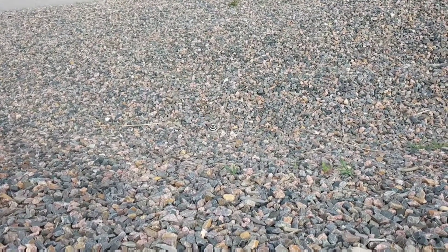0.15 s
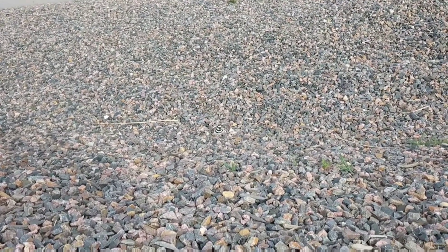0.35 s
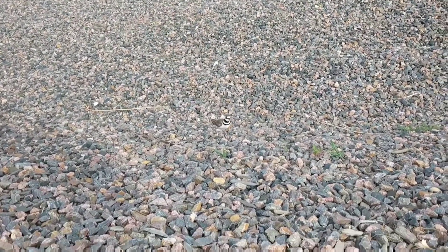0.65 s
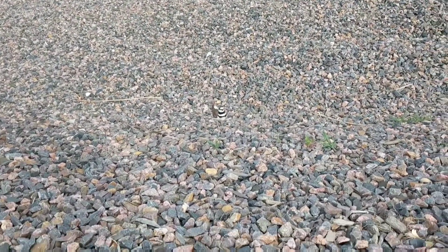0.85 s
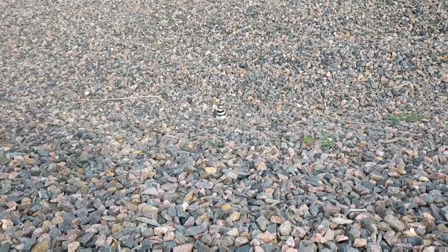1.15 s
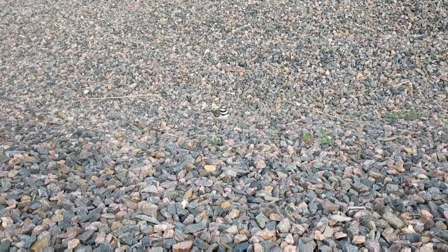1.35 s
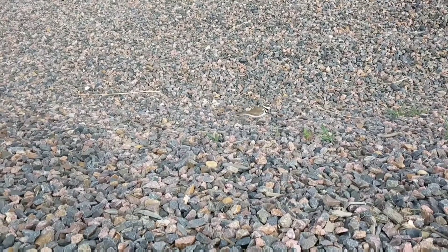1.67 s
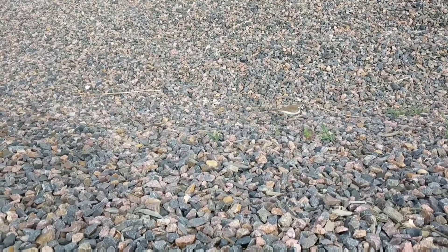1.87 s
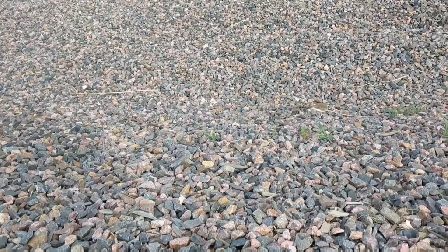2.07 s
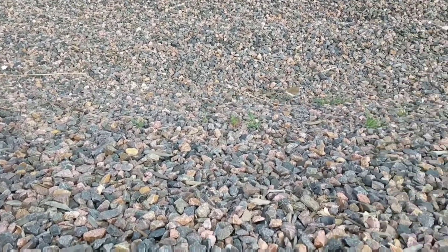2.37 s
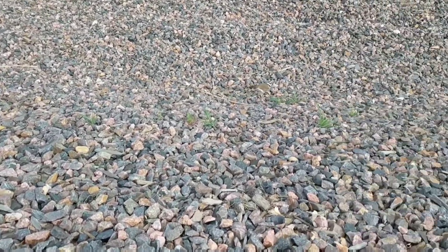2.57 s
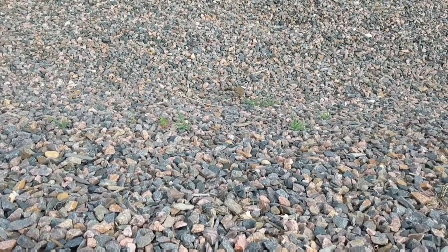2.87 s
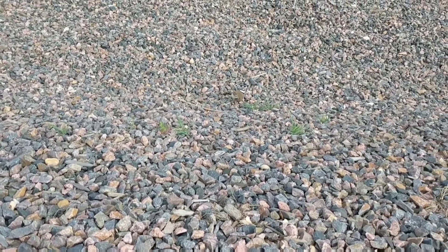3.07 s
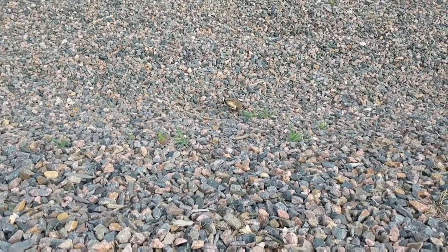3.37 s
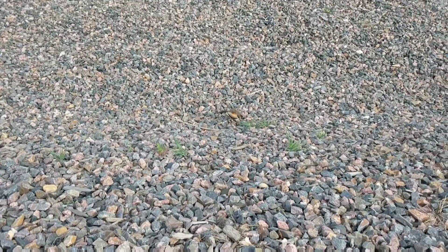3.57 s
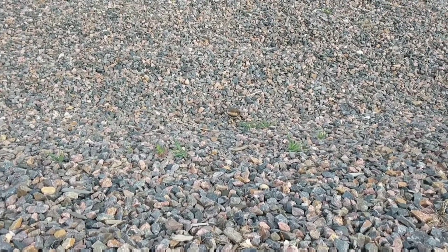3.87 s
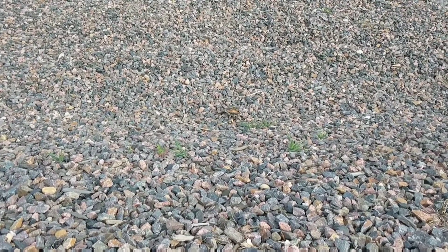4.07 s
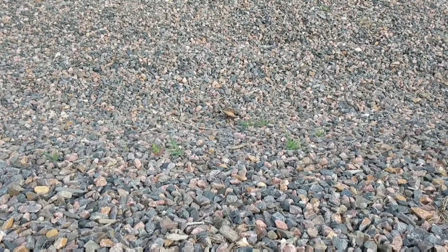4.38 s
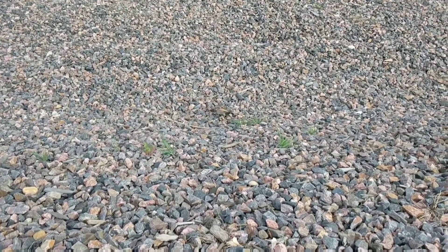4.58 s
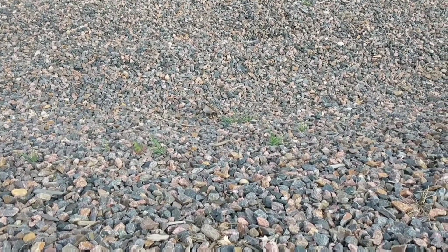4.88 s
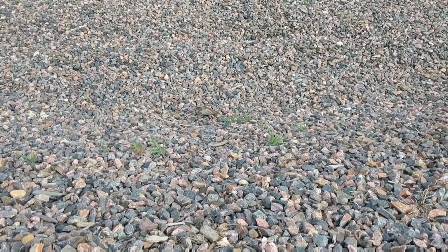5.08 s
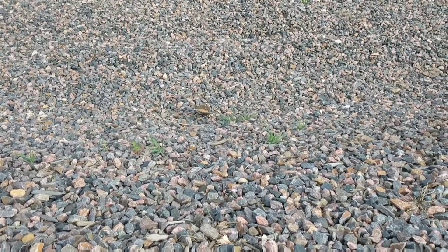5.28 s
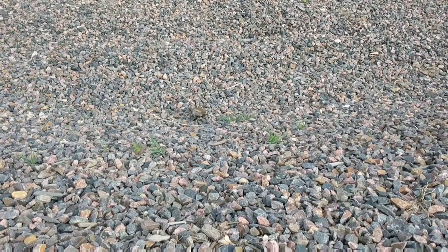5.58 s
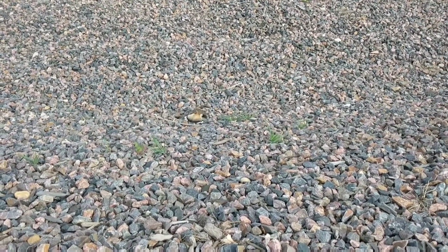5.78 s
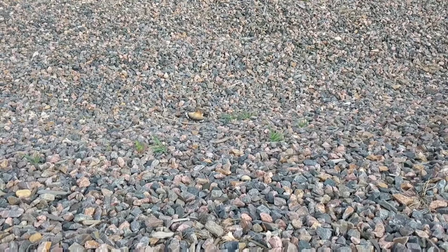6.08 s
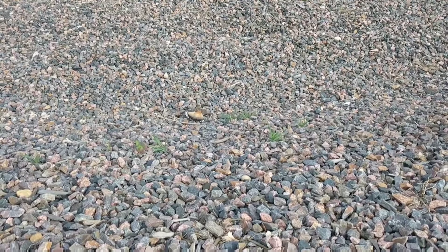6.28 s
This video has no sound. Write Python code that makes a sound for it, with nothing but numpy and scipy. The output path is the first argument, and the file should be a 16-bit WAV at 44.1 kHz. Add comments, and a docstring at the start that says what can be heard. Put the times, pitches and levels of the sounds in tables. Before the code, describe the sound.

A killdeer on gravel gives three piercing slurred cries, then a long stuttering trill, as wind buffets the microphone and distant songbirds whistle.

```python
"""Wind buffets the microphone throughout while a killdeer on open gravel gives three piercing cries,
then, later, a long stuttering trill. Songbirds whistle far off and a few small ticks sound close by.
The bird is stacks of roughened harmonics; the songbirds are single slurred sines with echoes.
Wind and air are shaped noise, with pulses for single eddies; the ticks are decaying noise bursts."""
import sys
import numpy as np
from scipy import signal
from scipy.fft import rfft, irfft
from scipy.io import wavfile
from scipy.ndimage import uniform_filter1d

SR = 44100
rng = np.random.default_rng(int(sys.argv[2]) if len(sys.argv) > 2 else 0)


def generate_wav(signal):
    """Clip the signal to [-1, 1] and save it as 16-bit WAV at the path in sys.argv[1]."""
    frames = np.transpose(np.atleast_2d(signal))
    scaled = np.clip(frames, -1, 1) * 32767
    pcm = np.round(scaled).astype(np.int16)
    wavfile.write(sys.argv[1], SR, pcm)


N = 284004
TIME = np.arange(N) / SR

# breeze on the microphone: time_s, relative rumble_db, relative flutter_db
BREEZE = [(0.0, -22.5, -28), (.33, -31, -39.5), (.72, -23.5, -23), (.97, -30.5, -41), (1.15, -30, -36),
          (1.25, -36.5, -54.5), (1.42, -31, -37), (1.65, -26, -35), (1.77, -36, -57.5), (1.9, -29, -35.5),
          (2.55, -35.5, -47.5), (2.8, -34.5, -36), (3.35, -40.5, -53.5), (3.7, -29, -48), (4.06, -40, -60),
          (4.7, -34, -42), (5.4, -31.5, -50.5), (5.7, -34, -48), (5.8, -33, -37), (6.44, -32, -31)]
# gusts on top of it: centre_s, width_s, relative flutter_db, relative rumble_db
GUST_ROWS = [(.12, 0.13, -27, -33), (0.225, 0.042, -26, -29), (0.528, 0.044, -20.5, -32),
             (1.065, .06, -30, -31.5), (1.36, .04, -34, -30), (1.847, 0.036, -32, -32.5),
             (1.961, 0.064, -27, -31), (2.164, 0.063, -31, -37.5), (2.335, 0.041, -51.5, -26.5),
             (2.48, .05, -43, -28.5), (2.663, 0.039, -38, -31), (2.835, 0.034, -34, -41),
             (3.003, 0.089, -39.5, -41), (3.209, 0.033, -36.5, -38), (3.307, 0.047, -34.5, -46.5),
             (3.468, 0.048, -32, -38), (3.536, 0.064, -32, -41), (3.626, 0.026, -37, -22),
             (3.735, 0.054, -39.5, -26.5), (4.346, .11, -46, -37), (4.73, 0.068, -31.5, -34),
             (4.815, 0.04, -39, -31.5), (4.919, 0.048, -43.5, -28.5), (5.193, 0.023, -27.5, -22.5),
             (5.817, 0.083, -27, -32.5), (5.921, 0.02, -22.5, -27), (6.24, 0.12, -29.5, -37)]


def amp(db):
    """Decibels to gain."""
    return 10 ** (np.asarray(db) / 20)


def unit(x):
    """Scales to rms 1."""
    return x / np.sqrt(np.mean(x ** 2) + 1e-20)


def add(mix, start_s, sound):
    """Mixes a sound in at start_s, cut off at the end of the mix."""
    part = mix[max(round(start_s * SR), 0):][:len(sound)]
    part += sound[:len(part)]


def noise(points):
    """Noise of rms 1 with a spectrum of (Hz, relative dB per Hz) points."""
    point_hz, db = np.transpose(points)
    hz = np.fft.rfftfreq(N, 1 / SR)
    shape_db = np.interp(np.log(hz + 1), np.log(point_hz + 1), db, right=-120)
    return unit(irfft(rfft(rng.standard_normal(N)) * amp(shape_db), N))


def wander(size, rate_hz):
    """Smooth random drift of about rms 1, its spectrum rolling off around rate_hz."""
    padded = size + SR // 4
    hz = np.fft.rfftfreq(padded, 1 / SR)
    drift = irfft(rfft(rng.standard_normal(padded)) * np.exp(-(hz / rate_hz) ** 2))
    return unit(drift)[:size]


def gate(t, rise_s, fall_s):
    """Smooth start and end of a note."""
    rise = np.clip(t / rise_s, 0, 1)
    fall = np.clip((t[-1] - t) / fall_s, 0, 1)
    return np.sin(np.pi / 2 * rise * fall) ** 2


def scatter(x, t60_s, edge_hz):
    """Diffuse reflections: a decaying noise tail of energy 1 that has lost its treble."""
    t = np.arange(SR) / SR
    low_pass = signal.butter(2, min(edge_hz, SR / 2.2), fs=SR)
    tail = signal.lfilter(*low_pass, rng.standard_normal(SR))
    tail *= amp(-60 * t / t60_s)
    return signal.fftconvolve(x, tail / np.linalg.norm(tail))[:N]


def buffet(band, breeze_db, gust_db, lump_db, lump_hz, size):
    """One band of wind noise: its power is the lumpy breeze plus a bell-shaped swell for each gust."""
    steady_db = np.interp(TIME, [row[0] for row in BREEZE], breeze_db)
    power = amp(steady_db + lump_db * wander(N, lump_hz)) ** 2
    for (centre_s, width_s, *_), db in zip(GUST_ROWS, gust_db):
        power += amp(db) ** 2 * np.exp(-np.minimum((2 * (TIME - centre_s) / width_s) ** 2, 20))
    # dividing by the band's own running power makes it follow the curve
    return band * np.sqrt(power / uniform_filter1d(band ** 2, size=size))


def wind(grain_db=5.5):
    """Deep rumble, lumpy flutter that can turn harsh, and single eddies: a push between two pulls."""
    # rumble spectrum: freq_hz, relative db_per_hz
    rumble_band = [(10, -60.5), (25, -20), (32, -15.5), (42, -4.5), (62, 2.5), (90, -1), (130, -6),
                   (190, -15.5), (280, -29.5), (450, -82.5)]
    # flutter spectrum: freq_hz, relative db_per_hz
    flutter_band = [(70, -25), (125, 2), (170, 4.5), (220, 1.5), (310, -4.5), (450, -15.5), (650, -29),
                    (1000, -38.5), (1800, -66.5), (4000, -91.5)]
    # upper band where the wind turns harsh: freq_hz, relative db_per_hz
    harsh_band = [(200, -30), (380, 0), (600, -1), (900, -14.5), (1500, -34.5), (3000, -60)]
    # level of that band before its grain: time_s, level_db
    harsh_curve = [(0.0, -54), (.42, -67), (.6, -47), (.95, -70.5), (3.25, -71.5), (3.5, -55.5),
                   (3.8, -79.5), (5.68, -75), (5.8, -50.5), (6.1, -50.5), (6.44, -48)]
    # eddies striking the microphone: centre_s, peak_db, half_width_s (to the zero crossing)
    eddies = [(0.092, -16, 0.00098), (.228, -12, 0.0022), (0.599, -18.5, .00047), (.666, -15.5, 0.0022),
              (.718, -18.5, 0.00066), (.803, -15.5, 0.0018), (.883, -15.5, 0.002), (1.042, -16.5, .0015),
              (1.14, -21, 0.0012), (2.067, -20.5, 0.0016), (3.037, -27, 0.00075), (3.454, -24, 0.0008),
              (5.192, -20, 0.00084)]
    _, rumble_db, flutter_db = np.transpose(BREEZE)
    _, _, gust_flutter_db, gust_rumble_db = np.transpose(GUST_ROWS)
    grain = unit(amp(grain_db * wander(N, 38)))
    rumble = buffet(noise(rumble_band), rumble_db, gust_rumble_db, lump_db=2.15, lump_hz=17, size=3500)
    flutter = buffet(noise(flutter_band) * grain, flutter_db, gust_flutter_db,
                     lump_db=2.4, lump_hz=20, size=4000)
    harsh = noise(harsh_band) * grain * amp(np.interp(TIME, *np.transpose(harsh_curve)))
    out = amp(-0.75) * rumble + amp(-1.6) * flutter + harsh
    for centre_s, peak_db, half_width_s in eddies:
        u = np.arange(-.02, .02, 1 / SR) / half_width_s
        add(out, centre_s - .02, amp(peak_db) * (1 - u ** 2) * np.exp(-u ** 2 / 2))
    return out


def air(air_db=-63):
    """The quiet hiss of open ground, with a few faint far swells of midrange noise."""
    # hiss spectrum: freq_hz, relative db_per_hz
    hiss_band = [(150, -2), (400, -13), (700, -4.5), (1310, -7), (1940, -12.5), (2400, -13), (3070, -18.5),
                 (4730, -16.5), (5400, -18), (6740, -22.5), (8000, -22.5), (10100, -17), (11500, -26),
                 (16000, -30.5)]
    # swell spectrum: freq_hz, relative db_per_hz
    swell_band = [(700, -23.5), (1200, -18), (1580, -5.5), (1900, -14), (2600, -15), (4000, -23)]
    # swells: centre_s, sigma_s, relative level_db
    swell_rows = [(3.413, 0.13, -62), (4.978, 0.091, -60), (5.873, 0.092, -58.5)]
    swell = sum(amp(db) * np.exp(-((TIME - centre_s) / sigma_s) ** 2 / 2)
                for centre_s, sigma_s, db in swell_rows)
    hiss = noise(hiss_band) * amp(air_db + .9 * wander(N, 9))
    return hiss + noise(swell_band) * swell * amp(-2)


def syrinx(hz, harmonics_db, odd_db, bright_db, jitter, onset_jitter, shimmer_db, slip=22):
    """A stack of harmonics, rough at the start and wherever the pitch jumps, until the membranes settle."""
    size = len(hz)
    jump = uniform_filter1d(abs(np.gradient(np.log(hz))), size=300)
    unsettled = onset_jitter * np.exp(-np.arange(size) / SR / 0.006) + slip * jump
    rough = jitter * wander(size, 350) + unsettled * wander(size, 1800)
    phase = 2 * np.pi * np.cumsum(hz * (1 + rough)) / SR
    out = np.zeros(size)
    for k, db in enumerate(harmonics_db, 1):
        # the throat holds the second harmonic steady; the others come and go
        waver_db = shimmer_db * wander(size, 120) * (.2 if k == 2 else 1)
        # of the odd harmonics only the fundamental can swell; the upper ones only fade
        hollow_db = odd_db if k == 1 else np.minimum(odd_db, 0) * (k % 2)
        treble_db = bright_db * (k > 3)
        gain = amp(db + hollow_db + treble_db + waver_db)
        out += gain * np.sin(k * phase) * (k * hz < SR / 2)
    return np.sqrt(2) * out


def cries(bright_db_per_octave=30, steady_share=.6, waver_db=0.9):
    """Long slurred cries, louder and brighter as they rise; the fundamental swings less than the rest."""
    # one pitch curve per cry: time_s, pitch_hz
    pitch_curves = [
        [(.025, 2260), (.04, 2352), (.056, 2240), (.075, 2066), (.115, 2220), (.155, 2353), (.178, 2385),
         (.2, 2362), (.223, 2030)],
        [(.342, 2196), (.349, 2326), (.358, 2459), (.402, 2411), (.44, 2444), (.452, 2430), (.457, 2200),
         (.462, 2120)],
        [(1.451, 2190), (1.459, 2420), (1.472, 2420), (1.497, 2015), (1.56, 2190), (1.645, 2400), (1.666, 2414),
         (1.708, 2287), (1.743, 2066)],
    ]
    # one row per cry: relative level_db, brightness_db, hollow_until_s (middle of the fade)
    cry_rows = [(-18.5, 1.1, 0.0023), (-19, 0, 0.11), (-19.5, -0.5, .038)]
    # harmonics 1, 2, ..: relative level_db
    cry_harmonics_db = [-19, 0.5, -23, -24, -26, -24.5, -29.5]
    full_hz, louder_db_per_octave, loudest_db = 2360, 28.5, -0.05
    tire_s, tire_db = 0.026, 11.5  # it weakens just before its end
    # the second cry cracks up to a higher pitch between these times
    crack_from_s, crack_to_s, crack_ratio = .4395, .4555, 1.212
    # a hollow voice has lost its odd harmonics
    hollow_depth_db, hollow_onset_s, hollow_fade_s = -19, 0.013, 4 * 0.0059
    out = np.zeros(N)
    for curve, (db, own_bright_db, hollow_until_s) in zip(pitch_curves, cry_rows):
        s, pitch_hz = np.transpose(curve)
        t = np.arange(0, s[-1] - s[0], 1 / SR)
        now_s = t + s[0]
        cracked = uniform_filter1d(1. * (now_s > crack_from_s) * (now_s < crack_to_s), size=50)
        # the pitch rounds its turns over 400 samples
        glide_hz = uniform_filter1d(np.interp(now_s, s, pitch_hz), size=400, mode="nearest")
        hz = glide_hz * crack_ratio ** cracked
        effort_db = np.minimum(louder_db_per_octave * np.log2(hz / full_hz), loudest_db)
        tired = np.clip(1 - (t[-1] - t) / tire_s, 0, 1) ** 2
        hollow = np.clip(.5 - (t - hollow_until_s) / hollow_fade_s, 0, 1)
        hollow *= np.minimum(t / hollow_onset_s, 1)
        odd_db = hollow_depth_db * hollow - steady_share * effort_db - .6
        rise_bright_db = np.minimum(bright_db_per_octave * np.log2(hz / 2280), 3)
        bright_db = own_bright_db + rise_bright_db - 6 * cracked - 5 * tired
        voice = syrinx(hz, cry_harmonics_db, odd_db, bright_db,
                       jitter=.0012, onset_jitter=0.0046, shimmer_db=1.06)
        level_db = db + effort_db - tire_db * tired + waver_db * wander(len(t), 50)
        add(out, s[0], voice * amp(level_db) * gate(t, 0.0021, 0.0034))
    return out


def whistle(length_s, start_hz, end_hz, db):
    """One nearly pure slur with a slight warble; falling ones arch over, rising ones sweep straight up."""
    arch_hz, arch_s = 340, .045  # slurs longer than arch_s arch less
    t = np.arange(0, length_s, 1 / SR)
    u = t / length_s
    height_hz = arch_hz * min(arch_s / length_s, 1) ** 2 * (end_hz < start_hz)
    hz = start_hz + (end_hz - start_hz) * u + height_hz * np.sin(np.pi * u)
    hz *= 1 + 0.011 * wander(len(t), 140)
    return amp(db) * np.sin(2 * np.pi * np.cumsum(hz) / SR) * gate(t, 0.0054, .01)


def songbirds():
    """Far whistles among phrases of quick random chirps, with a ragged echo."""
    # clearest whistles: start_s, length_s, start_hz, end_hz, relative level_db
    whistle_rows = [(0.278, .046, 3060, 2800, -58), (.96, .07, 1740, 2110, -70),
                    (1.315, .05, 1595, 1780, -66), (1.319, .13, 1260, 1670, -64),
                    (1.852, 0.054, 3100, 2520, -53.5), (1.915, 0.043, 2360, 3300, -57),
                    (2.271, 0.038, 3220, 3540, -54.5), (2.308, 0.083, 3170, 2900, -57.5),
                    (2.38, .13, 2394, 2120, -68), (2.485, 0.062, 2480, 2500, -59),
                    (2.87, 0.056, 2360, 2720, -58.5), (3.311, 0.03, 3010, 2420, -51),
                    (3.341, 0.033, 3020, 3670, -58), (3.379, 0.031, 2930, 2740, -43),
                    (3.79, 0.034, 5450, 6530, -65), (3.82, 0.061, 3410, 3000, -58),
                    (3.758, 0.1, 2740, 2780, -61.5), (3.893, 0.081, 3120, 2990, -57),
                    (3.916, 0.044, 5150, 6800, -64.5), (4.068, 0.021, 5560, 6200, -63.5),
                    (5.453, 0.055, 3140, 2430, -53), (5.519, 0.043, 2215, 3200, -59),
                    (5.871, 0.046, 3130, 3810, -58), (5.897, 0.056, 2450, 3400, -56),
                    (5.936, 0.032, 2960, 2654, -48.5), (6.392, 0.039, 2680, 2430, -55)]
    # phrases of softer twittering: start_s, length_s, mean pitch_hz, relative level_db
    twitter_rows = [(1.772, .14, 3180, -69.5), (2.888, .16, 2470, -58), (3.291, 0.13, 2904, -61.5),
                    (3.725, .29, 2520, -66), (5.353, .27, 2380, -62.5), (5.484, 0.083, 2890, -58),
                    (6.0, 0.12, 2280, -61)]
    chirps_per_s, chirp_s, chirp_spread = 28, .042, 0.0497  # spread: rms share of the pitch
    out = np.zeros(N)
    for start_s, *slur in whistle_rows:
        add(out, start_s, whistle(*slur))
    for start_s, length_s, hz, db in twitter_rows:
        for at_s in np.arange(0, length_s - chirp_s / 2, 1 / chirps_per_s):
            late, first, last, loud = rng.standard_normal(4)
            first_hz = hz * (1 + chirp_spread * first)
            last_hz = hz * (1 + chirp_spread * last)
            chirp = whistle(chirp_s, first_hz, last_hz, db + 3.1 * loud)
            add(out, start_s + at_s + 0.0066 * late, chirp)
    heard = amp(-0.5) * out + amp(-11.5) * scatter(out, t60_s=0.34, edge_hz=21000)
    add(heard, .055, amp(-16.0) * scatter(out, t60_s=0.029, edge_hz=5500))
    return heard


def ticks():
    """Tiny dry snaps, mostly treble: tilted noise bursts that die away at once."""
    # start_s, relative level_db, treble tilt_db_per_octave
    tick_rows = [(2.117, -51.5, 11), (2.287, -32.5, 13), (2.436, -43.5, 3), (2.478, -48, 1),
                 (2.482, -34, 3), (2.488, -45.5, 3), (5.985, -50, 7)]
    out = np.zeros(N)
    t = np.arange(1024) / SR
    octaves = np.log2(np.fft.rfftfreq(len(t), 1 / SR) / 10000 + 0.017)  # offset keeps 0 Hz finite
    for start_s, db, tilt_db in tick_rows:
        burst = unit(irfft(rfft(rng.standard_normal(len(t))) * amp(tilt_db * octaves)))
        add(out, start_s, amp(db - 3) * burst * np.exp(-t / 0.0018))
    return out


def trill(crest=0.25, sag=0.88, scoop=0.02, fade_db=6, thin_db=14, rasp_db=-31, swell_db=8):
    """Short notes over a faint rasp that leads them: each scoops up to a crest, then sags and fades."""
    # start_s, length_s (before a 4.2 ms extension), relative level_db, crest pitch_hz
    notes = [(4.134, 0.041, -37.5, 1952), (4.309, .033, -37, 2030), (4.428, 0.045, -32, 2108),
             (4.533, 0.031, -32, 2097), (4.624, 0.031, -29, 2171), (4.702, .026, -29.5, 2093),
             (4.76, 0.032, -33.5, 2026), (4.833, 0.025, -30, 2053), (4.91, 0.021, -36.5, 2014),
             (4.973, .029, -37.5, 2050), (5.038, 0.024, -35.5, 1993), (5.103, 0.016, -36.5, 1928),
             (5.156, 0.023, -34.5, 1942), (5.204, .025, -33.5, 1970), (5.258, 0.022, -35, 1964),
             (5.314, 0.021, -36, 1910), (5.351, 0.022, -34.5, 1978), (5.398, .024, -35, 1940),
             (5.441, 0.028, -38, 1990), (5.49, .02, -32, 2015), (5.544, .016, -36, 1985),
             (5.582, 0.02, -35, 2010), (5.631, 0.023, -35, 2015), (5.677, 0.021, -35.5, 1974),
             (5.799, 0.027, -31, 2030), (5.87, 0.026, -31, 1977), (5.922, 0.024, -33, 2014),
             (5.998, 0.011, -39.5, 1935), (6.036, 0.021, -31.5, 2004), (6.094, 0.011, -34.5, 1960),
             (6.129, .019, -32, 1972), (6.19, 0.025, -30, 2010), (6.24, 0.022, -31, 2040),
             (6.308, 0.03, -31, 2005), (6.341, .027, -30.5, 2100), (6.397, 0.025, -32, 2066)]
    # harmonics 1, 2, ..: relative level_db
    trill_harmonics_db = [-13.5, -0.5, -16, -22.5, -19, -30.5, -28, -32]
    # harmonics 1, 2, ..: change_db from mid-trill to its end, reversed toward its start
    drift_db = [-1.3, -0.3, 3, -1, 2.7, 0, -3, -1]
    # rasp spectrum: freq_hz, relative db_per_hz
    rasp_band = [(1000, -35), (2000, 16), (3000, -10), (4300, 8), (7000, -2.5), (10000, 0), (16000, -24)]
    # each note sags by base_sag_hz plus, once warmed up, a share of the way to the resting pitch
    rest_hz, sag_share, base_sag_hz = 1923, 0.77, 28.2
    warm_up_s = (4.43, 4.57)  # that share sets in between these times
    even_s, fuller_db_per_doubling = 0.017, 6  # longer notes keep fuller odd harmonics
    # the treble follows each note's level; no two notes have quite the same colour
    base_bright_db, bright_share, uneven_db = 1.14, 0.16, 1.5
    out, push = np.zeros(N), np.zeros(N)
    for start_s, length_s, db, top_hz in notes:
        t = np.arange(0, length_s + 0.0042, 1 / SR)
        u = t / t[-1]
        starting = np.clip(1 - u / crest, 0, 1)
        fallen = np.sin(np.pi / 2 * np.clip((u - crest) / (sag - crest), 0, 1)) ** 2
        warmed = np.interp(start_s, warm_up_s, (0, 1))
        sag_hz = base_sag_hz + sag_share * (top_hz - rest_hz) * warmed
        hz = (top_hz - sag_hz * fallen) * (1 - scoop * starting ** 2)
        # the longer, calmer notes swell in; the quick ones start at full strength
        calm = np.clip((length_s - .022) / 0.023, 0, 1.5)
        level_db = db + calm * (-0.5 - swell_db * starting) - fade_db * fallen
        # the odd harmonics are full only in the middle of the note
        odd_db = fuller_db_per_doubling * np.log2(length_s / even_s)
        odd_db = odd_db - thin_db * (2 * u - 1) ** 2 - 12 * np.exp(-t / 0.0039)
        progress = np.interp(start_s, (notes[0][0], notes[-1][0]), (-1, 1))
        harmonics_db = np.add(trill_harmonics_db, progress * np.array(drift_db))
        harmonics_db[2:] += uneven_db * rng.standard_normal(len(harmonics_db[2:]))
        bright_db = base_bright_db + bright_share * (level_db - db)
        voice = syrinx(hz, harmonics_db, odd_db, bright_db, jitter=.005, onset_jitter=.022, shimmer_db=2.4)
        add(out, start_s, voice * amp(level_db) * gate(t, 0.0042, 0.01))
        add(push, start_s - .006, amp(db + rasp_db) * gate(t, 0.0014, 0.0024))
    return out + push * noise(rasp_band)


def scene():
    """The bird, its scatter off the gravel, a faint far echo, and the open air."""
    bird = cries() + trill()
    out = bird + amp(-28) * scatter(bird, t60_s=.13, edge_hz=11000)
    out += amp(-44.0) * scatter(bird, t60_s=1.0, edge_hz=6100)
    add(out, .19, amp(-52.0) * scatter(bird, t60_s=.01, edge_hz=5000))
    return (out + songbirds() + ticks() + wind() + air())[None]


def record(dry, low_cut_hz=36, edge_hz=16200):
    """The microphone's low cut and the recorder's band limit."""
    high_pass = signal.butter(4, low_cut_hz, "highpass", fs=SR, output="sos")
    cut = signal.sosfilt(high_pass, dry)
    band_limit = signal.firwin(511, edge_hz, window=("kaiser", 9), fs=SR)
    return signal.oaconvolve(cut, band_limit[None], "same")


dry = scene()
out = record(dry)
generate_wav(out)
```